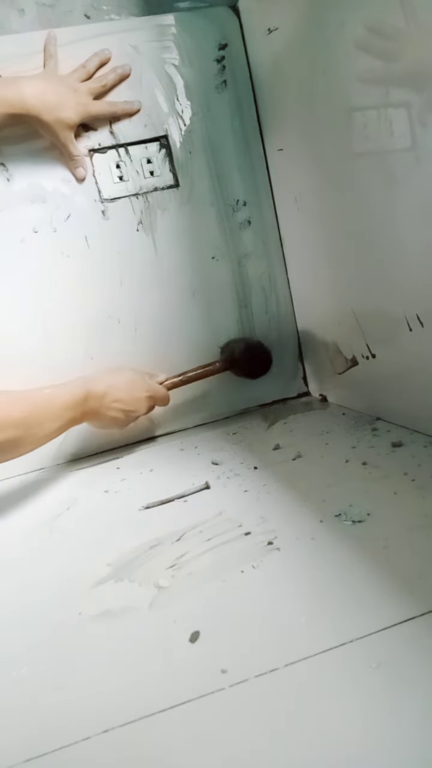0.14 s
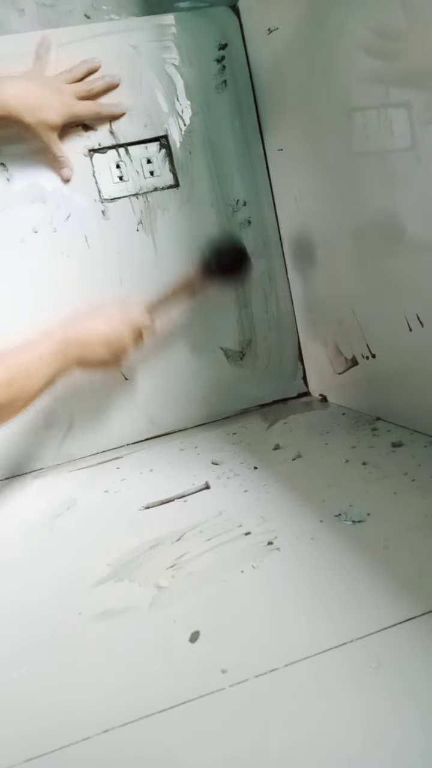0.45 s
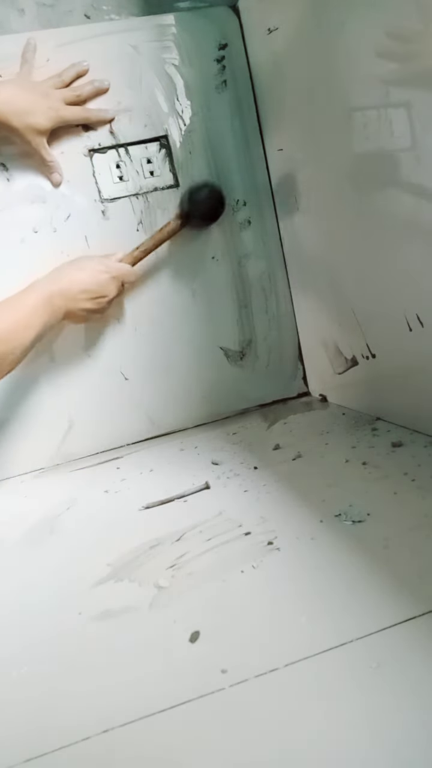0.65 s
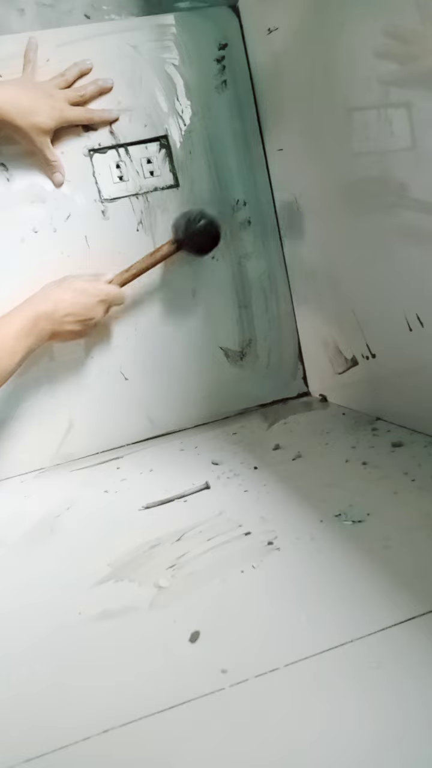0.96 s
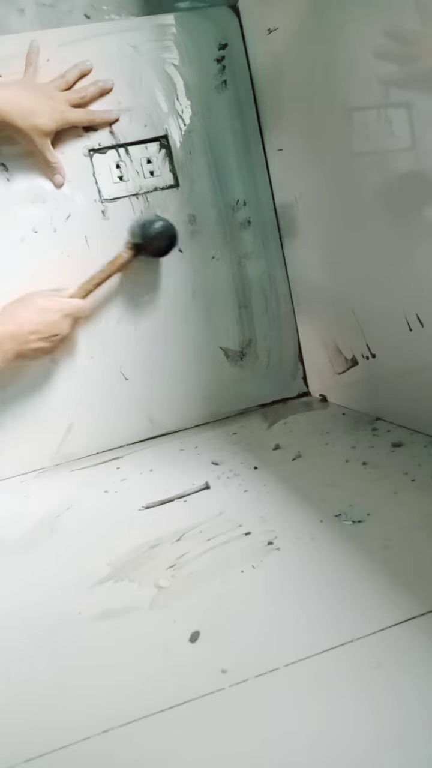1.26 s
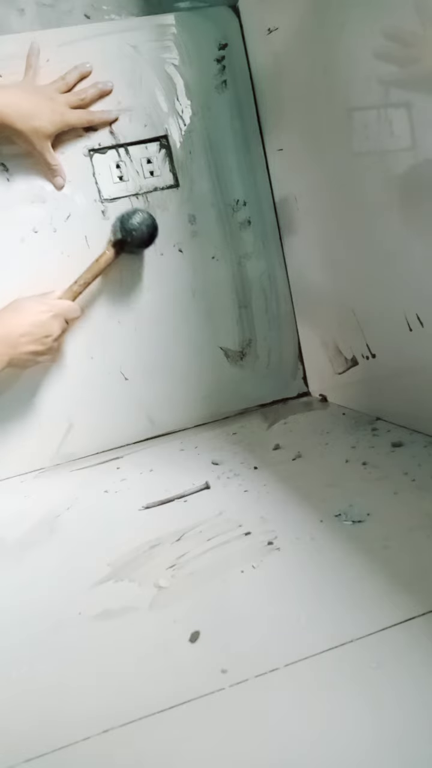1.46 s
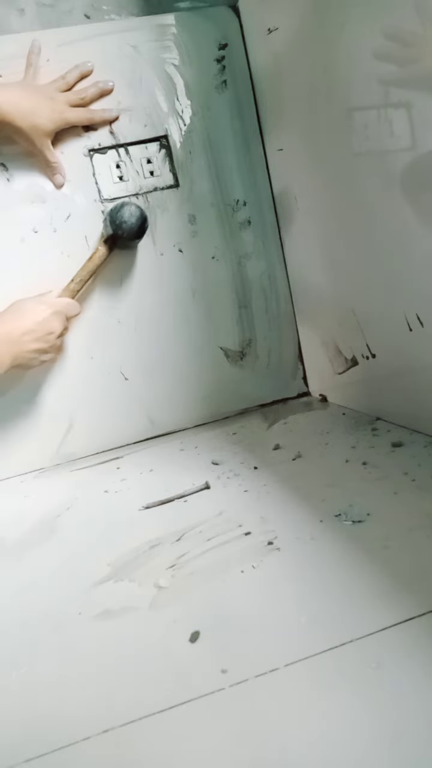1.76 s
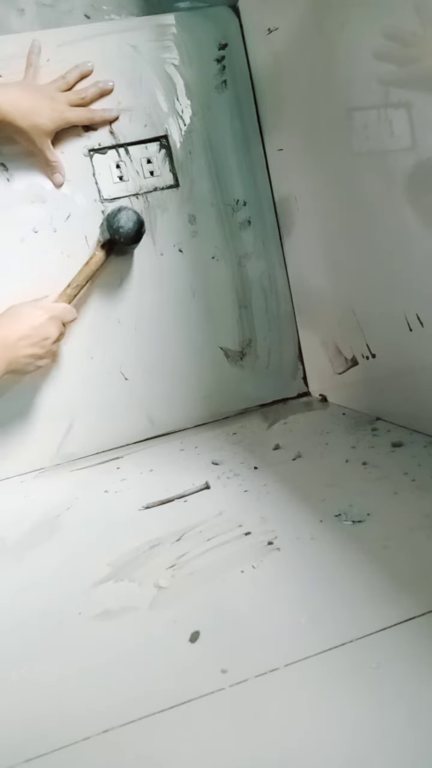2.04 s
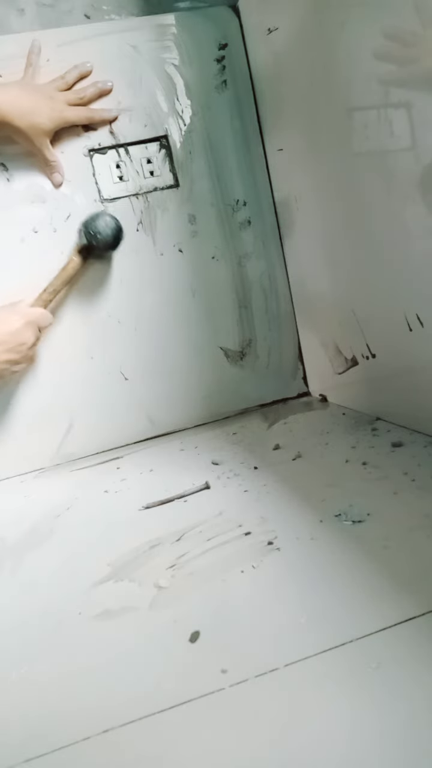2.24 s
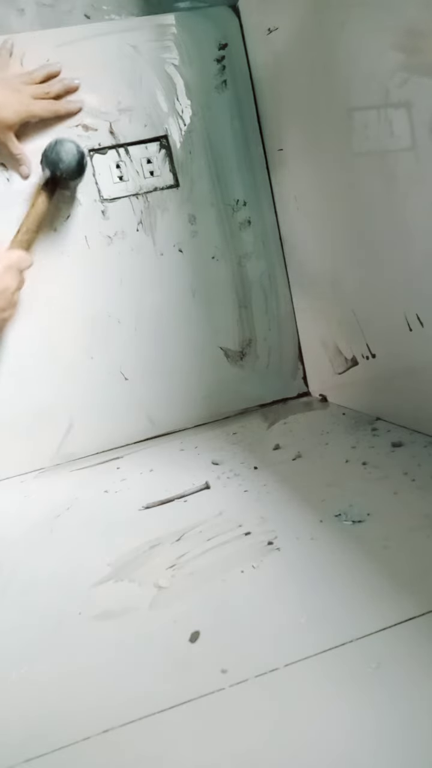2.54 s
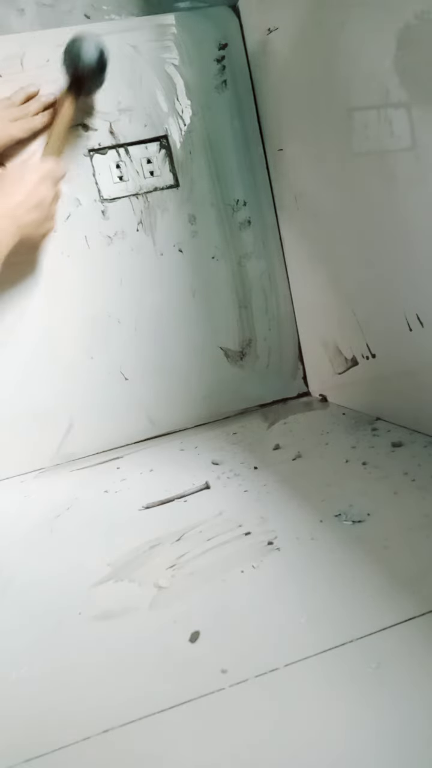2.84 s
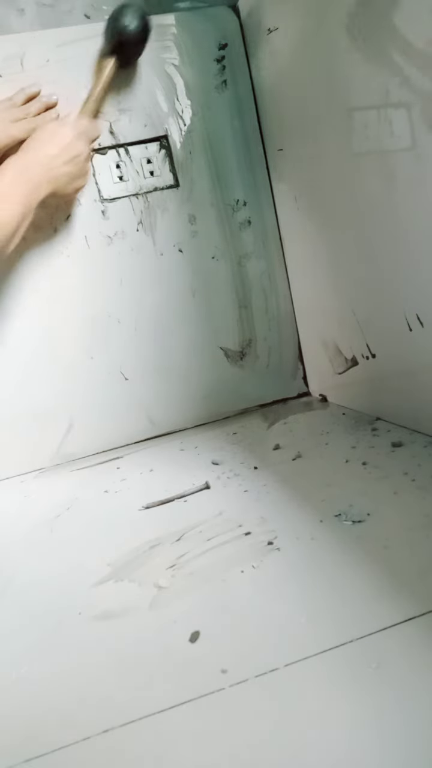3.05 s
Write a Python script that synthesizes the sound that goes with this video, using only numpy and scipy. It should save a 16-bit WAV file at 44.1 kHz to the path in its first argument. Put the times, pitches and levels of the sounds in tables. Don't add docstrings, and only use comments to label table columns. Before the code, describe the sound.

A rubber mallet knocks dully on a wall tile, with hiss dipping around each knock.

```python
import sys
import numpy as np
from scipy import signal
from scipy.fft import rfft, irfft
from scipy.io import wavfile

SR = 44100
rng = np.random.default_rng(int(sys.argv[2]) if len(sys.argv) > 2 else 0)


def wrap_up_sound(samples):
    columns = np.atleast_2d(samples).T
    tamed = np.clip(columns, -1, 1)
    steps = np.round(tamed * 32767).astype(np.int16)
    wavfile.write(sys.argv[1], SR, steps)


def ratio_of_db(decibels):
    return 10 ** (np.asarray(decibels, float) / 20)


N = 141120

# start_s [s], level_db [dB], duck_db [dB], held_s [s]
KNOCK_EVENTS = [(0.1192, -2, 4, 0.084), (0.272, -1, 5.5, 0.093), (0.435, -3.5, 2.5, 0.088),
                (0.543, -1, 7.5, 0.091), (1.0008, -5, 5, 0.079), (1.1796, -1.5, 4, 0.06),
                (1.344, 0, 7, .11), (1.4856, -1, 6.5, 0.077), (1.6485, -1, 9.5, 0.1), (1.9467, 0, 8, 0.16),
                (2.2459, 0.5, 8, 0.11), (2.5016, -2, 7, 0.076), (2.7077, -1.5, 3, 0.086),
                (2.8628, -1, 5, 0.054), (3.0319, -5.5, 0.5, 0.057)]


def level_curve(rows):
    return np.interp(np.arange(N) / SR, *np.transpose(rows))


def rms_one(x):
    return x / np.sqrt(np.mean(x ** 2) + 1e-20)


def filtered(x, order, hz, kind):
    return signal.sosfilt(signal.butter(order, hz, kind, fs=SR, output="sos"), x)


def drift(rate_hz):
    step, settle = 40, 2000
    r = np.exp(-2 * np.pi * rate_hz * step / SR)
    chance = rng.standard_normal(N // step + settle + 2)
    slow = signal.lfilter([1], [1, -2 * r, r * r], chance)[settle:]
    return np.interp(np.arange(N) / step, np.arange(len(slow)), rms_one(slow))


def ring(clicks, hz, t60_s):
    r = ratio_of_db(-60 / (t60_s * SR))
    w = 2 * np.pi * hz / SR
    return signal.lfilter([0, np.sin(w)], [1, -2 * r * np.cos(w), r * r], clicks + 1e-18)


def patchy_noise(spectrum, peaks, patchy_db, rate_hz):
    hz = np.maximum(np.fft.rfftfreq(N, 1 / SR), 1)
    points, levels = np.transpose(spectrum)
    db = np.interp(np.log(hz), np.log(points), levels)
    for centre, width, height_db in peaks:
        db += height_db * np.exp(-((hz - centre) / width) ** 2)
    inside = (hz > points[0] / 2) * (hz < points[-1] * 1.2)
    noise = rfft(rng.standard_normal(N)) * ratio_of_db(db) * inside

    place = 2 * np.log2(hz / 20)
    together = drift(4.0)
    first = int(2 * np.log2(points[0] / 40))
    last = int(2 * np.log2(points[-1] / 20)) + 2
    out = np.zeros(N)
    for k in range(first, last + 1):
        band = irfft(noise * np.clip(1 - abs(place - k), 0, 1), N)
        out += band * ratio_of_db(patchy_db * (.6 * together + drift(rate_hz)))
    return rms_one(out)


def port_hiss():
    hz, level_db = 7140, -68
    band = filtered(rng.standard_normal(N), 2, [hz / 1.08, hz * 1.08], "band")
    return ratio_of_db(level_db) * rms_one(band)


def machine_hiss():
    # pitch_hz [Hz], level_db [dB per Hz]
    spectrum = [(150, -18.5), (250, -6.5), (525, -10), (583, -12), (1330, -2.5), (3510, -13.5), (4790, -41),
                (6880, -35), (15500, -57.5)]
    # pitch_hz [Hz], width_hz [Hz], level_db [dB]
    peaks = [(1490, 600, 2.5), (3180, 390, -7), (3433, 158, 2.5), (7230, 630, 6), (5050, 2700, 7),
             (15300, 1200, 9.5)]
    # time_s [s], level_db [dB]
    loudness = [(0, -29), (.5, -26), (.85, -20), (1.3, -23), (1.9, -23), (2.5, -23.5), (3.2, -23.5)]
    return ratio_of_db(level_curve(loudness)) * patchy_noise(spectrum, peaks, patchy_db=1.39, rate_hz=17.6)


def machine_rumble():
    # pitch_hz [Hz], level_db [dB per Hz]
    spectrum = [(15, -38), (25, -29), (113, 7.5), (251, 1.5), (306, -0.5), (340, -18), (400, 0),
                (520, -35.5), (880, -120)]
    # pitch_hz [Hz], width_hz [Hz], level_db [dB]
    peaks = [(72, 10, 6), (45, 20, -5.5), (100, 8, -4.5), (131.4, 10, 0.5)]
    # time_s [s], level_db [dB]
    loudness = [(0, -30), (.3, -34.5), (.8, -35.5), (1.5, -27.5), (1.7, -24.5), (1.9, -21.5), (2.2, -22.5),
                (2.5, -26), (2.68, -29), (2.85, -29), (3.05, -24), (3.2, -30)]
    return ratio_of_db(level_curve(loudness)) * patchy_noise(spectrum, peaks, patchy_db=4.0, rate_hz=5.6)


def floor_thuds():
    # start_s [s], level_db [dB]
    thuds = [
        (.275, -29),
        (1.22, -31),
        (2.64, -23),
        (2.76, -27),
        (3.13, -27),
    ]
    start_s, level_db = np.transpose(thuds)
    clicks = np.zeros(N)
    clicks[(start_s * SR).astype(int)] = ratio_of_db(level_db)
    soft_push = np.hanning(SR // 80)
    return np.convolve(ring(clicks, 62.4, t60_s=0.22), soft_push / soft_push.sum())[:N]


def room_tail():
    # pitch_hz [Hz], width [ratio], level_db [dB], t60_s [s]
    bands = [(133, 1.092, -29.5, 0.34), (198.7, 1.081, -23.5, 0.41), (287.5, 1.15, -33, 0.69),
             (386.3, 1.05, -21.5, 0.67), (451.5, 1.067, -24.5, 0.6), (580, 1.128, -27, 0.79),
             (723, 1.1, -29, 0.5), (923, 1.062, -27, 0.55), (1078, 1.1, -29.5, 0.47),
             (1500, 1.2, -24, 0.14), (2070, 1.1, -30, 0.11)]
    rise_s = 0.0045
    step = 20
    t = np.arange(N)[::step] / SR
    struck = [(-0.11, 5.5)]
    struck += [(start_s, level_db + duck_db) for start_s, level_db, duck_db, _ in KNOCK_EVENTS]
    white = rng.standard_normal((2, N))
    out = np.zeros(N)
    for k, (hz, width, band_db, t60_s) in enumerate(bands):
        band = rms_one(filtered(white[k % 2], 2, [hz / width, hz * width], "band"))
        power = np.zeros(len(t))
        for start_s, knock_db in struck:
            age = np.clip(t - start_s, 0, None)
            swell = 1 - np.exp(-age / rise_s)
            power += (ratio_of_db(knock_db - 60 * age / t60_s) * swell) ** 2
        out += ratio_of_db(band_db) * np.repeat(np.sqrt(power), step)[:N] * band
    return out


def grit():
    # start_s [s], level_db [dB]
    snaps = [
        (.273, -42),
        (1.651, -36),
    ]
    hz, t60_s = 12000, .012
    t = np.arange(N) / SR
    shape = np.zeros(N)
    for start_s, level_db in snaps:
        shape += ratio_of_db(level_db - 60 * np.clip(t - start_s, 0, 1) / t60_s) * (t >= start_s)
    return 3 * filtered(shape * rng.standard_normal(N), 2, [.85 * hz, 1.15 * hz], "band")


def wall_echoes(x):
    # late_s [s], level_db [dB]
    echoes = [(.0085, -10.5), (.0175, -8)]
    thin = filtered(x, 2, 705, "high")
    out = x.copy()
    for late_s, level_db in echoes:
        out += ratio_of_db(level_db) * np.pad(thin, (int(late_s * SR), 0))[:N]
    return out


def mallet_on_tile():
    # pitch_hz [Hz], t60_s [s], then level_db [dB] at each of six spots
    modes = [(135, 0.15, -24, -11, -15.5, -19, -16.5, -23), (190.6, 0.11, -9, -7, -9, -22.5, -28, -4.5),
             (296, 0.15, -14.5, -19, -19.5, -26.5, -18.5, -9), (337, 0.15, -32, -15, -15, -18, -7, -6.5),
             (387, 0.084, 1.5, -1, -3.5, -2, 0, 3), (446, 0.042, -2.5, 2, -3, 4, -3, -4),
             (496, 0.23, -18, -5.5, -21, -18.5, -27, -27), (587.4, 0.057, -10, 1.5, -3.5, -7.5, -6.5, -6),
             (715, .1, -6.5, -4.5, -14, -13.5, -18, -23), (799, 0.066, -23, -0.5, -18, -14, -21, -27),
             (905.5, 0.095, -32, -10.5, -12.5, -12.5, -21, -13), (1013, 0.2, -20, -10, -23, -15, -20.5, -9),
             (1128, 0.21, -24, -23, -28.5, -17.5, -26, -11), (1550, .05, -16, -18, -29.5, -23, -12, -24)]
    senses = [1, -1, -1, -1, 1, -1, -1, 1, -1, -1, -1, 1, -1, 1]
    spot_from_s = [.8, 1.1, 1.6, 2.6, 3.0]
    contact_s, knock_db, scatter_db = 0.00073, -1, 1.2

    start_s, level_db, duck_db, _ = np.transpose(KNOCK_EVENTS)
    spot = np.searchsorted(spot_from_s, start_s)
    scatter = scatter_db * rng.normal(0, 1, (len(start_s), len(modes)))
    strength_db = knock_db + level_db + duck_db
    out = np.zeros(N)
    for k, (hz, t60_s, *spot_db) in enumerate(modes):
        clicks = np.zeros(N)
        clicks[(start_s * SR).astype(int)] = ratio_of_db(strength_db + np.array(spot_db)[spot] + scatter[:, k])
        out += senses[k] * ring(clicks, hz, t60_s)
    push = np.hanning(int(contact_s * SR) + 3)
    pushed = np.convolve(out, push / push.sum())[:N]
    return filtered(pushed, 4, 87, "high")


def scene():
    background = machine_hiss() + machine_rumble() + floor_thuds()
    knocks = wall_echoes(mallet_on_tile()) + room_tail() + grit()
    return (background + knocks)[None]


def gain_control(x):
    ahead_s = [.026, .016, .012, .009, .026, .009, .012, .015, .016, .014, .014, .011, .018, .012, .005]
    duck_s, first_dip_s, first_dip_share = .004, .003, 0.79
    recover_db_per_s, treble_share, treble_from_hz = 136.5, 1.47, 3250

    t = np.arange(N) / SR
    cut_db, first_db = np.zeros(N), np.zeros(N)
    for (start_s, _, duck_db, held_s), early_s in zip(KNOCK_EVENTS, ahead_s):
        onset = np.clip((t - start_s + early_s) / duck_s, 0, 1)
        recovered_db = recover_db_per_s * np.clip(t - start_s - held_s, 0, None)
        cut_db = np.maximum(cut_db, onset * (duck_db - recovered_db))
        first_dip = np.clip(1 - (t - start_s) / first_dip_s, 0, 1)
        first_db += onset * first_dip_share * duck_db * first_dip
    hz = np.fft.rfftfreq(N, 1 / SR)
    treble = irfft(rfft(x) / (1 + (treble_from_hz / (hz + 1)) ** 10), N)
    lower = x - treble
    return lower * ratio_of_db(-cut_db - first_db) + treble * ratio_of_db(-treble_share * cut_db)


def band_limit(x):
    return signal.sosfilt(signal.butter(12, 16780, fs=SR, output="sos"), x)


def record(dry):
    ceiling = 1.3
    rounded = ceiling * np.tanh(gain_control(dry) / ceiling)
    top_cut = signal.cheby2(24, 50, 15750, fs=SR, output="sos")
    mix = signal.sosfilt(top_cut, rounded + port_hiss())
    return band_limit(mix)


dry = scene()
out = record(dry)
wrap_up_sound(out)
```